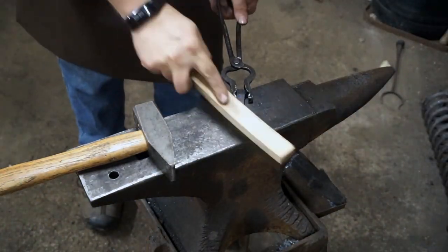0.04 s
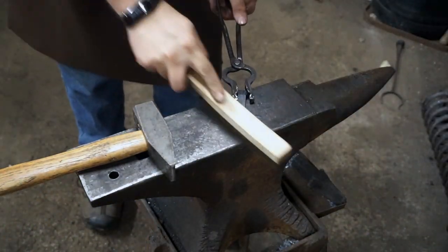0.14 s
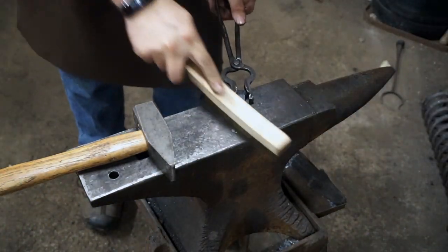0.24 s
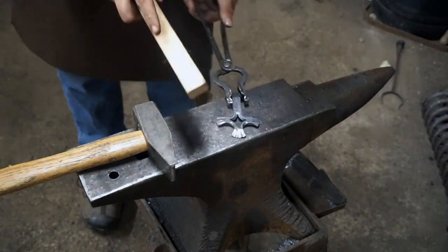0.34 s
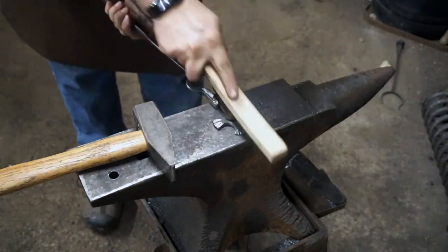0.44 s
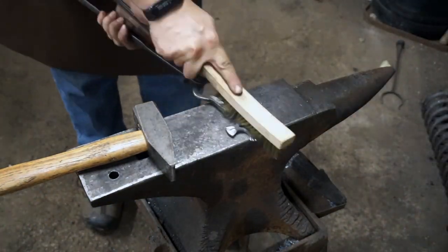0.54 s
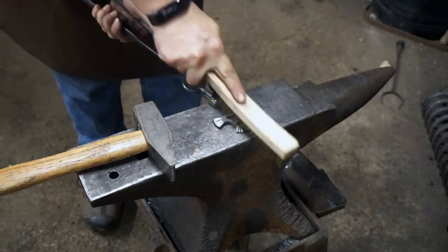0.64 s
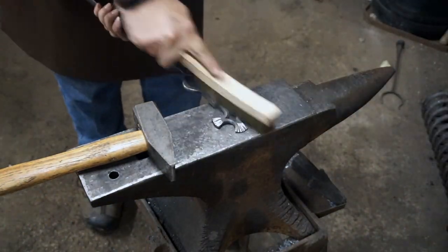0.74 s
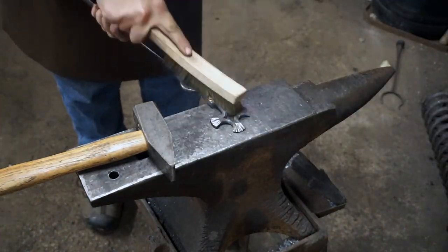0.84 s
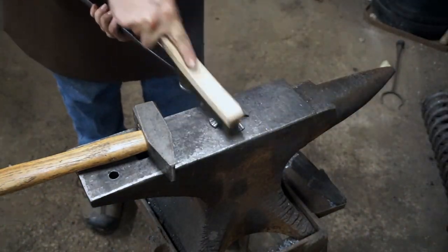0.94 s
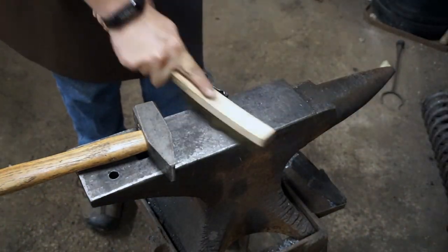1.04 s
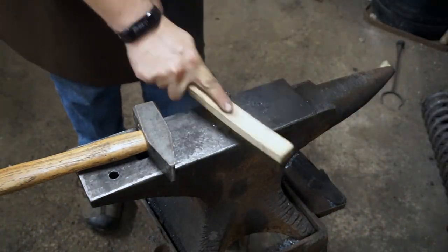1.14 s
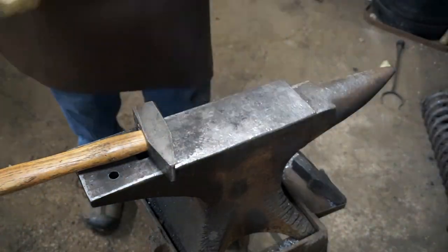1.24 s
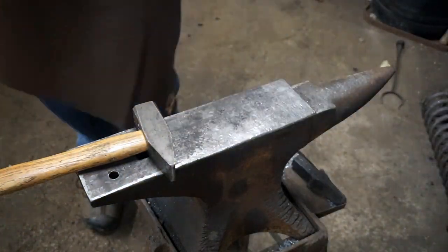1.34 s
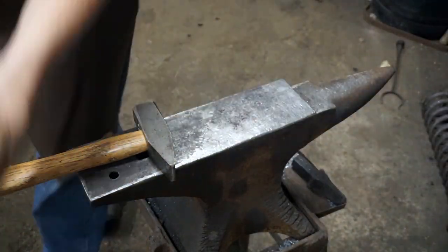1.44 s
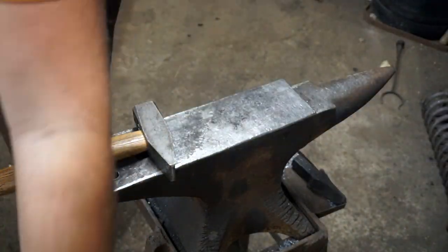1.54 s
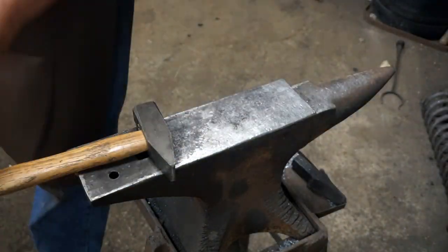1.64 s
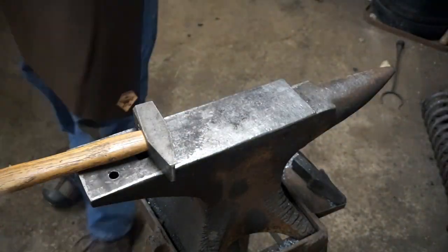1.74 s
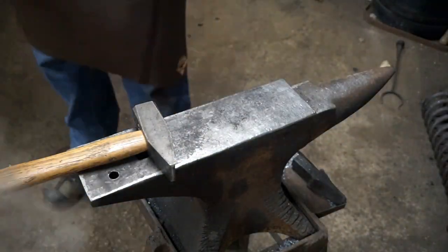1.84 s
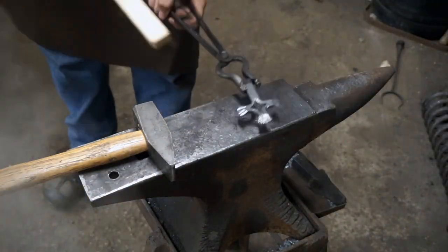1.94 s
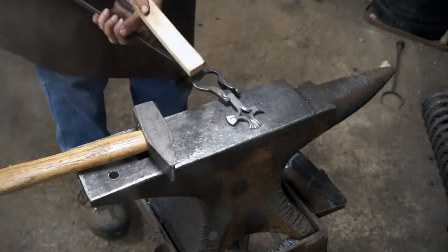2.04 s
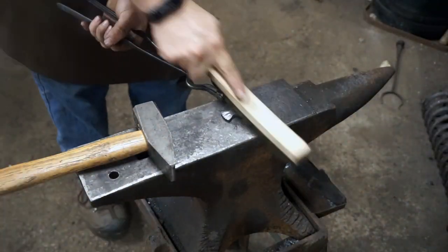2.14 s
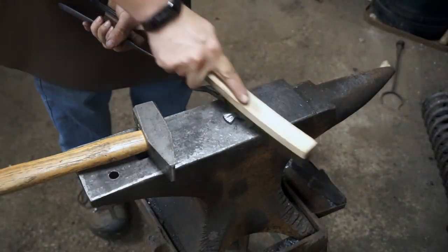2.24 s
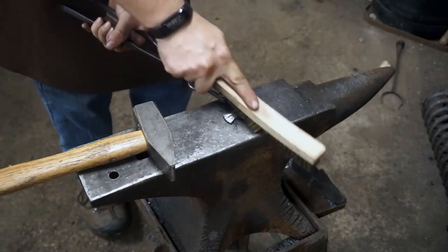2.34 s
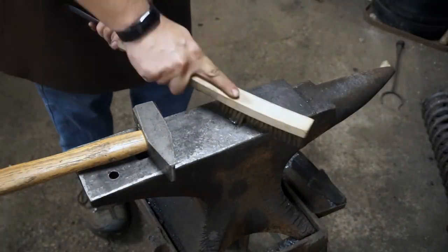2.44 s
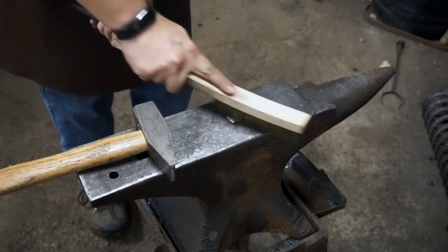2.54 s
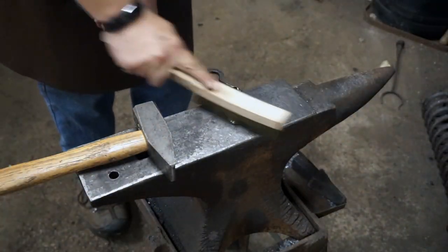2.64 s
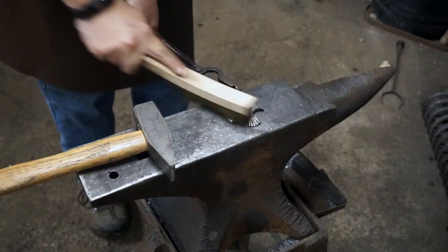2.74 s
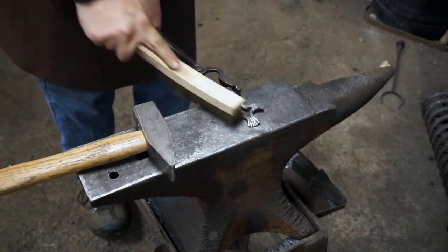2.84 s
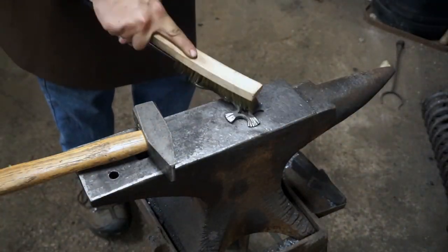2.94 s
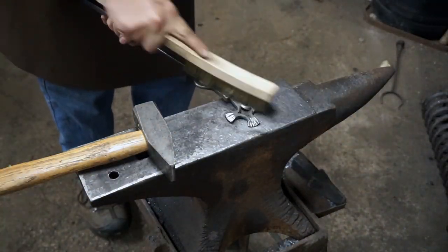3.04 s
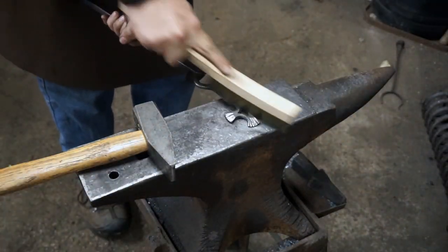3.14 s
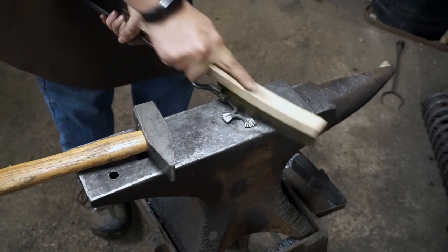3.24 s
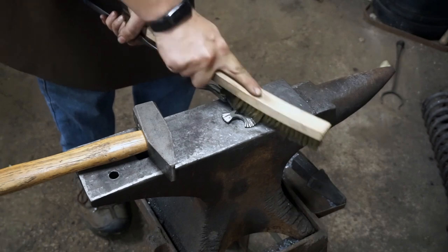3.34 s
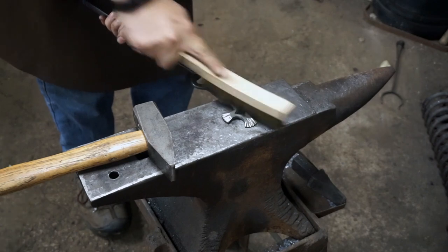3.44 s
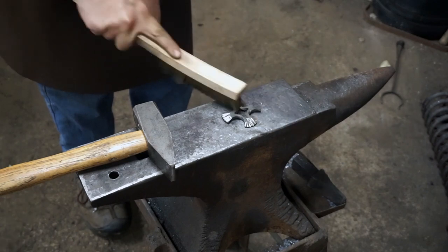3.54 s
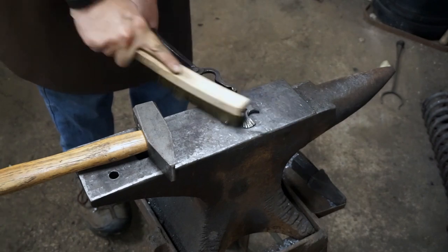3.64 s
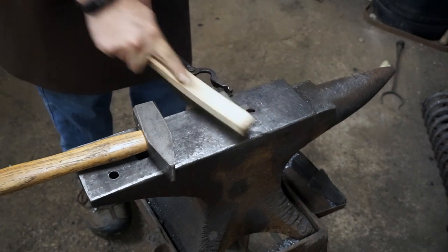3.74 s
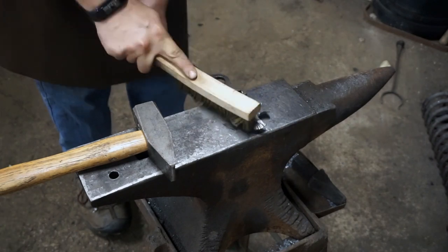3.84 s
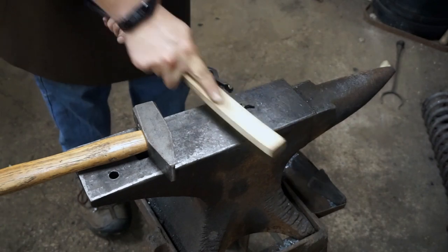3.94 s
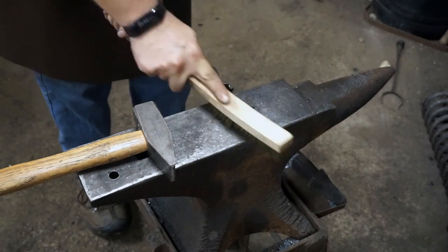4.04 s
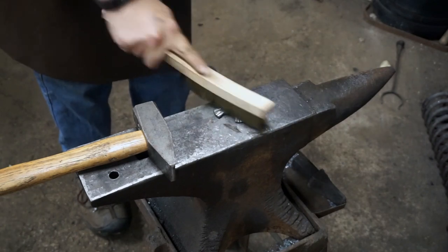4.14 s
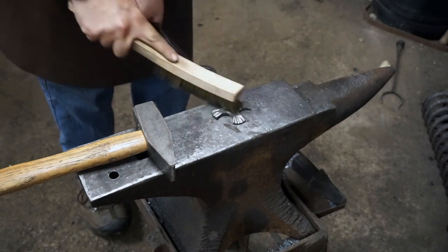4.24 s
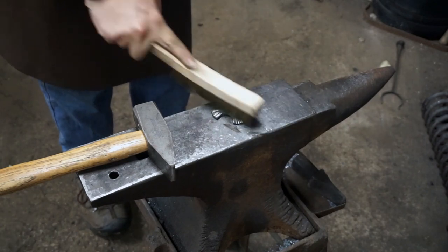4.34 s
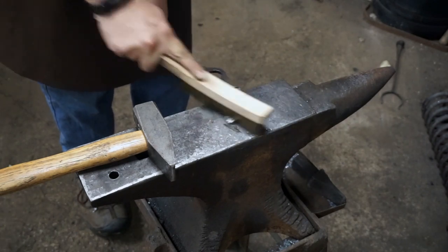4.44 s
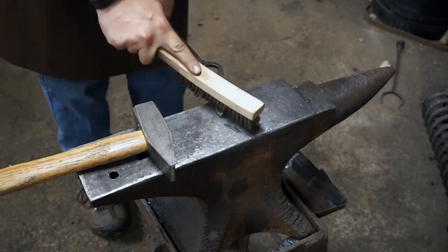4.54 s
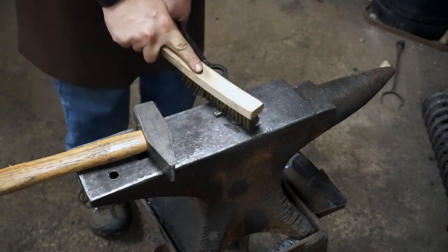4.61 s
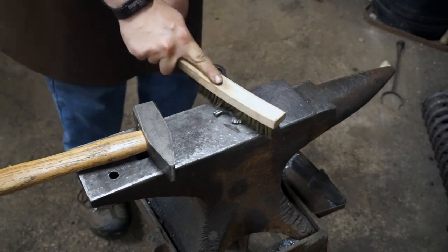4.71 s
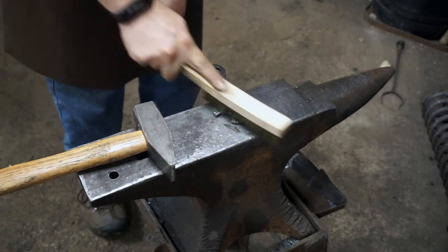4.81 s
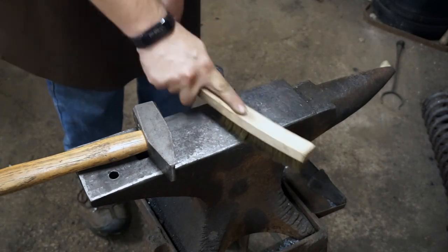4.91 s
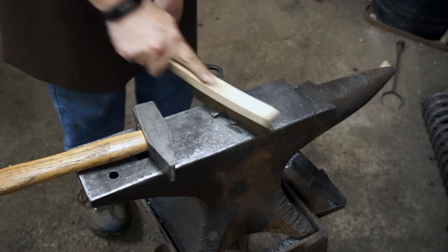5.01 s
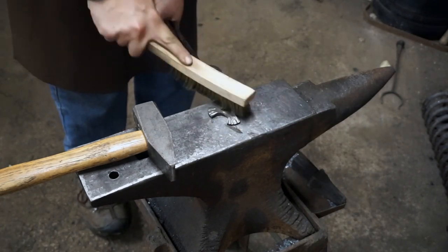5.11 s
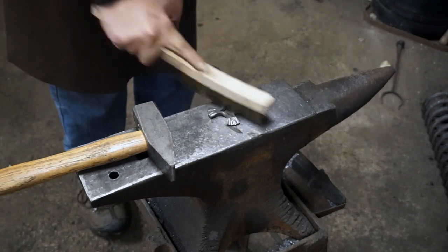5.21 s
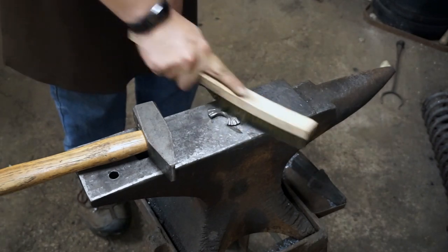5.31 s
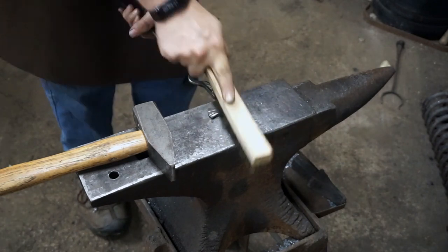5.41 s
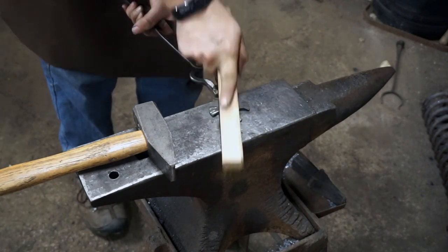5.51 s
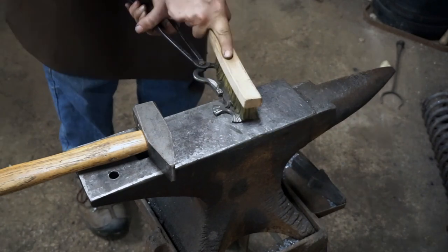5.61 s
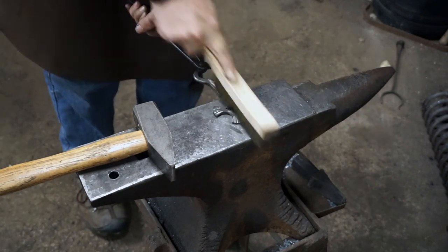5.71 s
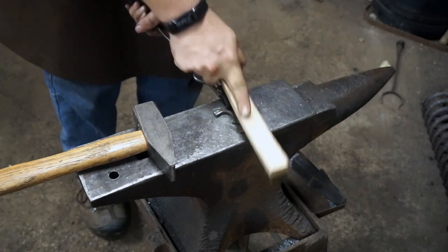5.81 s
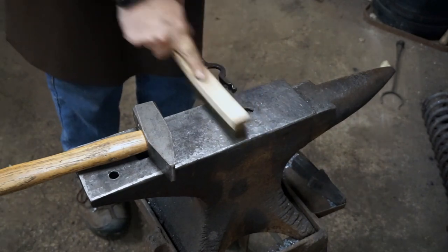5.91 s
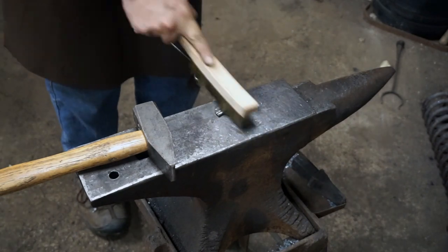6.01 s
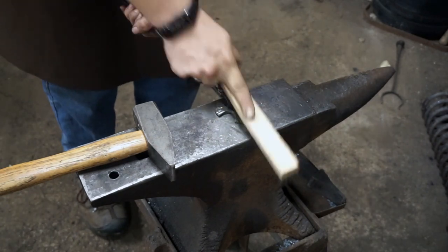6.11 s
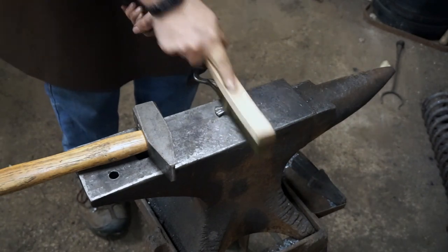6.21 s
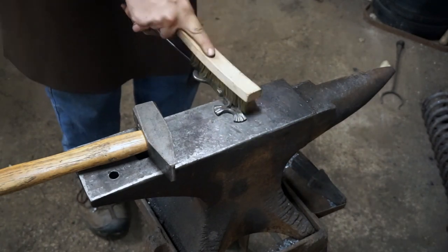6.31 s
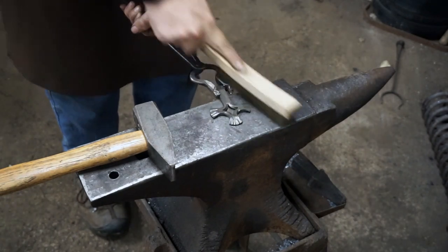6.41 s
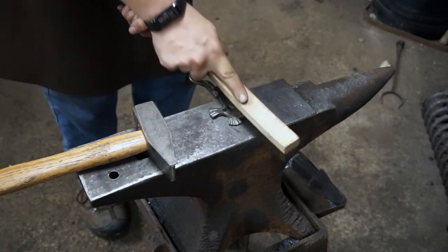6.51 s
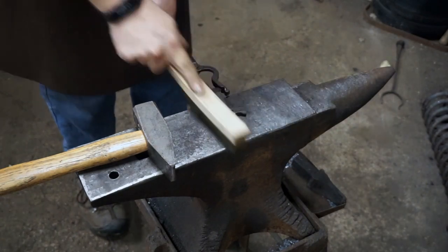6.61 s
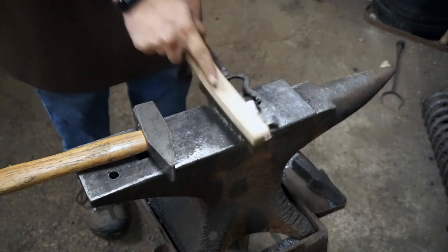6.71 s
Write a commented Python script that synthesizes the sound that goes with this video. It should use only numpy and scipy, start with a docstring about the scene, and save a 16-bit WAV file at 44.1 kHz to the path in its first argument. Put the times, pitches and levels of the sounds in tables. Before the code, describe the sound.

A wire brush scrubs a small metal piece on an anvil in fast, hissing strokes, pausing once as a steel tool clatters down.

```python
"""A wire brush scrubs a small forging on an anvil, about 22 strokes a second.
Wire tips slip and snag; the piece knocks and slides on the steel face. In a pause a steel tool
is put down with a clatter further off, then the tongs set the piece back and scrubbing resumes.
A hard-walled workshop echoes; a machine whines faintly in the distance."""
import sys
import numpy as np
from scipy import signal
from scipy.fft import rfft, irfft, next_fast_len
from scipy.io import wavfile
from scipy.ndimage import uniform_filter1d, map_coordinates

SR = 44100
rng = np.random.default_rng(int(sys.argv[2]) if len(sys.argv) > 2 else 0)


def store_pcm(level_fs):
    """Save levels as 16-bit WAV."""
    pcm = np.round(np.clip(level_fs, -1, 1) * 32767).astype(np.int16)
    wavfile.write(sys.argv[1], SR, np.atleast_2d(pcm).T)


N = 298157

# Spectra of the noise sources. Each row: frequency in Hz, relative density in dB.
AIR_SPECTRUM = [(25, -42), (150, -46), (230, -22), (320, -8.5), (480, -5.5), (700, 3), (1150, 6.5),
                (2500, 10.5), (6000, 6), (16000, -27.5)]
TOOL_SPECTRUM = [(150, -46), (400, -25.5), (700, -21.5), (1000, -10), (1350, -6.5), (1700, -9.5),
                 (1930, 3.5), (2200, -0.5), (2700, -2), (4600, -4.5), (8000, -5), (12000, -1.5), (15500, 1)]
SLIDE_SPECTRUM = [(200, -60), (1500, -33), (3000, -9.5), (6200, -6.5), (8200, -6), (9900, 1), (11500, -1.5),
                  (15000, -3.5)]
THUD_SPECTRUM = [(100, -61), (300, -39), (650, -32), (1050, -9), (1700, -7), (1930, -1.5), (2250, 2),
                 (3200, -2.5), (5000, -3.5), (8000, -6.5), (15000, -10)]
RASP_SPECTRUM = [(150, -70), (400, -30.5), (700, -23), (1100, -9), (1700, -9.5), (1950, 0), (2200, -1),
                 (2600, -0.5), (3200, 1.5), (4500, 0), (7000, -5), (12000, -18)]
HISS_SPECTRUM = [(2500, -55), (5000, -18.5), (6600, -9.5), (7300, -3), (8100, -5), (9200, -1),
                 (10800, -4.5), (12000, -1.5), (12900, 2.5), (14000, -3.5), (16000, -8)]
# Workshop decay. Each row: frequency in Hz, T60 in seconds.
SHOP_T60_S = [(200, 0.54), (2000, 0.26), (7000, 0.57), (15000, 0.26)]
# Stereo likeness of room and bristles. Each row: frequency in Hz, left-right coherence from 0 to 1.
SHOP_COHERENCE = [(300, .995), (1200, 0.95), (2300, 0.77), (4500, 1), (14000, 0.11)]
BRUSH_COHERENCE = [(2000, 0.97), (4500, 0.51), (14000, 0.53)]
# Anvil to the right. Each row: frequency in Hz, left minus right in dB.
ANVIL_PAN_DB = [(2000, 0), (4000, -3), (8000, -3.5), (14000, -5)]
# Machine running up. Each row: time in seconds, pitch in Hz, level in dB.
MACHINE_LOW_TONE = [(0, 315, -99), (.6, 329, -97.5), (2.1, 343.7, -99), (3.1, 356, -115)]
MACHINE_HIGH_TONE = [(1.701, 534, -104), (2.5, 543.6, -88.5), (3.0, 573, -82.5), (3.1, 564, -115)]
# Tool landing. Each row: start in seconds, level in dB, rattle T60 in seconds, high-pass corner in Hz.
TOOL_CONTACTS = [(1.571, -29.5, 0.1, 1780), (1.583, -20, 0.074, 1300), (1.591, -15.5, 0.015, 1190),
                 (1.609, -29.5, 0.16, 596), (1.636, -27.5, 0.068, 1080), (1.654, -27, 0.097, 1110),
                 (1.782, -47.5, 0.22, 2020)]
# Piece slipping on anvil and tongs. Each row: start in seconds, end in seconds, level in dB.
PIECE_SLIDES = [(0.398, 0.464, -62.5), (1.311, 1.425, -61), (1.513, 1.57, -62), (1.988, 2.04, -55.5),
                (2.118, 2.2, -61), (4.538, 4.619, -58.5), (4.758, 4.846, -55.5)]
# Resonances of the held piece. Each row: frequency in Hz, relative level in dB, T60 in seconds.
PIECE_MODES = [(1450, -5, 0.07), (2000, 1, 0.2), (2187, -1.5, 0.1), (2560, -13.5, 0.044), (2950, -3, 0.086),
               (3060, 1, 0.1), (3520, -25, 0.051), (6100, -12, .09)]
# Piece and tongs hitting the anvil.
# Each row: start in seconds, level in dB, clink offset in dB, clink centre in Hz.
ANVIL_KNOCKS = [(0.388, -46.5, 5, 4530), (0.403, -44.5, 2, 3800), (1.5, -48.5, 6.5, 6100),
                (1.946, -48.5, 13, 6900), (2.047, -43, 7, 9300), (2.072, -32, 2, 7170),
                (3.955, -31.5, 4, 9200), (3.992, -41, 7.5, 8850), (4.174, -35, -6, 10100),
                (4.53, -43, 5.5, 7440), (4.566, -42, 4.5, 4030), (4.697, -39, 0.5, 7800),
                (4.735, -39, 4, 8600), (4.866, -45, 11, 8400), (5.201, -39, -5.5, 2400),
                (5.285, -37.5, -3, 2400), (5.519, -42, -10, 9600), (5.701, -35, -3, 8000),
                (6.247, -39, -2, 10300), (6.319, -40, -5, 2200), (6.405, -40, -4, 9360),
                (6.734, -44, 6, 4570)]
# Brush bearing down. Each row: time in seconds, rasp relative to hiss in dB.
BRUSH_PRESSURE = [(0, -24.5), (.55, -12.5), (1.2, -13.5), (2.2, -15.5), (3.5, -17), (3.8, -14.5),
                  (4.4, -16.5), (5.8, -16.5), (6.3, -15.5)]
# Tufts catching an edge and flicking free. Each row: start in seconds, level in dB.
WIRE_SNAGS = [(.776, -23.5), (.856, -24), (2.046, -24.5), (3.042, -27.5), (3.127, -27), (3.218, -27.5),
              (3.303, -25.5), (3.647, -27), (3.95, -31.5), (3.958, -19), (4.092, -29.5), (4.173, -26),
              (4.429, -30), (4.628, -40), (5.634, -27), (5.671, -25), (5.862, -28), (5.940, -28.5),
              (6.098, -27), (6.253, -25), (6.331, -26)]
# Scrubbing runs. Each row: start in seconds, end in seconds, stroke count, first stroke (push or pull),
# push level in dB, swell over the run in dB, pull relative to push in dB.
SCRUB_RUNS = [(-.021, 0.353, 7, "push", -46, 11.5, -2.5), (.484, 0.688, 4, "push", -42.5, -3, -3.5),
              (.682, 1.233, 13, "push", -41, -3, -3), (2.199, 3.035, 18, "push", -40.5, 1.5, -2.5),
              (3.036, 3.944, 21, "push", -40.5, -1.5, -2.5), (4.041, 4.553, 12, "pull", -41, -2, -4),
              (4.826, 5.461, 15, "pull", -42, 0, -3), (5.467, 5.937, 12, "push", -41.5, 3.5, -2),
              (5.935, 6.793, 22, "push", -41.5, -1, -1.3)]

BITE_DELAY_S = 0.0063  # from the start of a push until the wires catch


def amp(db):
    """Decibels to gain."""
    return 10 ** (np.asarray(db) / 20)


def unit_rms(x):
    """Scale to rms 1."""
    return x / np.sqrt(np.mean(x ** 2) + 1e-20)


def at_hz(points, hz):
    """Interpolate (Hz, value) points on a log axis."""
    knots_hz, values = np.transpose(points)
    return np.interp(np.log(hz + 1), np.log(knots_hz), values)


def curves(rows):
    """One value per sample for each column after the time."""
    times_s, *columns = np.transpose(rows)
    return [np.interp(np.arange(N) / SR, times_s, column) for column in columns]


def seconds(length_s):
    """Time axis."""
    return np.arange(int(length_s * SR)) / SR


def add(track, start_s, sound):
    """Mix a sound into a track in place."""
    start = round(start_s * SR)
    sound = sound[max(-start, 0):]
    part = track[max(start, 0):][:len(sound)]
    part += sound[:len(part)]


def filtered(x, response):
    """Apply a gain given as a function of Hz."""
    size = next_fast_len(x.shape[-1] + SR // 4)
    return irfft(rfft(x, size) * response(np.fft.rfftfreq(size, 1 / SR)), size)[..., :x.shape[-1]]


def band_limit(hz, top_hz=15950):
    """Gain of a steep, rounded low-pass."""
    return 1 / (1 + (hz / top_hz) ** 240)


def coloured(x, spectrum):
    """Give a white signal a spectrum at equal power."""
    return filtered(x, lambda hz: unit_rms(amp(at_hz(spectrum, hz)) * band_limit(hz)))


def ticks(size, spread_db):
    """Dense tiny impacts of unequal strength, rms 1."""
    return unit_rms(rng.standard_normal(size) * amp(spread_db * rng.standard_normal(size)))


def shifting(x, depth_db, width_hz, hold_s):
    """Moving contact points excite changing resonances: random gain over time and frequency."""
    spectra = signal.stft(x, nperseg=256)[2]
    rows = np.arange(spectra.shape[-2]) * SR / 256 / width_hz
    cols = np.arange(spectra.shape[-1]) * 128 / SR / hold_s
    knots = rng.standard_normal((int(rows[-1]) + 2, int(cols[-1]) + 2))
    field = map_coordinates(knots, np.meshgrid(rows, cols, indexing="ij"), order=1)
    return signal.istft(spectra * unit_rms(amp(depth_db * field)), nperseg=256)[1][..., :N]


def stereo(pair, coherence):
    """Mix two unrelated signals to left and right with a given coherence."""
    def mid_side_gains(hz):
        angle = np.arccos(np.clip(at_hz(coherence, hz), 0, 1)) / 2
        return np.array([np.cos(angle), np.sin(angle)])
    mid, side = filtered(pair, mid_side_gains)
    return np.array([mid + side, mid - side])


def in_shop(x, early_db, tail_db, early_t60_s=0.099, tail_rise_s=0.0061):
    """Direct sound, early reflections from nearby surfaces and the workshop's tail."""
    hz, frame_s, spectra = signal.stft(rng.standard_normal((2, SR // 2)), SR, nperseg=256)
    decay = amp(-60 * frame_s / at_hz(SHOP_T60_S, hz)[:, None])
    tail = signal.istft(spectra * decay, SR, nperseg=256)[1]
    t = np.arange(tail.shape[1]) / SR
    tail *= np.minimum(t / tail_rise_s, 1)
    early = rng.standard_normal(tail.shape) * amp(-60 * t / early_t60_s)
    echo = amp(tail_db) * tail / np.linalg.norm(tail[0])
    echo += amp(early_db) * early / np.linalg.norm(early[0])
    return x + signal.fftconvolve(np.atleast_2d(x), stereo(echo, SHOP_COHERENCE), axes=1)[:, :N]


def shop_air(level_db=-68):
    """Steady workshop noise."""
    return amp(level_db) * stereo(coloured(rng.standard_normal((2, N)), AIR_SPECTRUM), SHOP_COHERENCE)


def machine_whine():
    """A distant machine runs up: two tones climb slowly, then fade."""
    tones = map(curves, (MACHINE_LOW_TONE, MACHINE_HIGH_TONE))
    return sum(amp(db) * np.sqrt(2) * np.sin(2 * np.pi * np.cumsum(hz) / SR) for hz, db in tones)


def bump(start_s=2.94, level_db=-65, t60_s=0.22):
    """One soft, dull bump."""
    track, t = np.zeros(N), seconds(0.2)
    add(track, start_s, amp(level_db - 60 * t / t60_s) * ticks(len(t), spread_db=3))
    return coloured(track, [(150, -26), (550, 1), (1200, 4), (3000, -27)])


def support_thumps(anvil_db=-52, tool_db=-63, growth=1.2, t60_s=0.07, corner_hz=170):
    """Knocks and landings give their heavy support a faint, dull push."""
    track, t = np.zeros(N), seconds(0.2)
    for blows, support_db in ((ANVIL_KNOCKS, anvil_db), (TOOL_CONTACTS, tool_db)):
        hardest_db = max(row[1] for row in blows)
        for start_s, db, *_ in blows:
            push_db = hardest_db + support_db + growth * (db - hardest_db)
            add(track, start_s, amp(push_db - 60 * t / t60_s) * rng.standard_normal(len(t)))
    return filtered(track, lambda hz: unit_rms(1 / (1 + (hz / corner_hz) ** 2)))


def tool_clatter(rise_share=0.019):
    """A steel tool lands, rattles and settles; longer rattles build more slowly."""
    track, t = np.zeros(N), seconds(0.2)
    for start_s, db, t60_s, corner_hz in TOOL_CONTACTS:
        attack = 1 - np.exp(-t / (rise_share * t60_s))
        rattle = attack * amp(db - 60 * t / t60_s) * ticks(len(t), spread_db=5.5)
        highpass = signal.butter(2, corner_hz, "highpass", fs=SR, output="sos")
        add(track, start_s, signal.sosfilt(highpass, rattle))
    return coloured(shifting(track, depth_db=3, width_hz=200, hold_s=0.04), TOOL_SPECTRUM)


def piece_slides(attack_s=0.018, release_t60_s=0.28):
    """Steel scrapes lightly on steel: each slide sets in, holds and dies away."""
    envelope, t = np.zeros(N), seconds(0.5)
    for start_s, end_s, db in PIECE_SLIDES:
        release_db = -60 * np.maximum(t - (end_s - start_s), 0) / release_t60_s
        add(envelope, start_s, np.minimum(t / attack_s, 1) * amp(db + release_db))
    friction = envelope * ticks(N, spread_db=3.5)
    return coloured(shifting(friction, depth_db=0.5, width_hz=450, hold_s=0.019), SLIDE_SPECTRUM)


def rocking_contacts(strokes, loose_from_s=4.8, offset_db=-11, clink_db=-4, clink_hz=9000):
    """Regripped, the piece lies loosely and knocks at each push. Rows as in ANVIL_KNOCKS."""
    return [(start_s + BITE_DELAY_S, db + rng.normal(offset_db, 3), clink_db, clink_hz)
            for start_s, _, db, is_pull in strokes if not is_pull and start_s > loose_from_s]


def piece_knocks(contacts, thud_db=-9, chatter_db=-11, ring_db=-24.5, crack_db=-10, hardening=0.6,
                 attack_s=0.00069, crack_t60_s=0.018, chatter_t60_s=0.12):
    """The gripped piece chatters on the anvil and rings briefly, differently at each contact."""
    thuds, rings = np.zeros((2, N))
    t = seconds(0.2)
    attack = 1 - np.exp(-t / attack_s)
    decay = amp(-60 * t / chatter_t60_s)
    mode_hz, mode_db, mode_t60_s = np.transpose(PIECE_MODES)[:, :, None]
    hardest_db = max(row[1] for row in ANVIL_KNOCKS)
    for start_s, db, clink_db, clink_hz in contacts:
        blow = attack * amp(db)
        # harder blows start more sharply
        crack = amp(crack_db + hardening * (db - hardest_db) - 60 * t / crack_t60_s)
        add(thuds, start_s, blow * (crack + amp(thud_db) * decay) * ticks(len(t), spread_db=6))
        clink = blow * amp(clink_db) * (crack + amp(chatter_db) * decay) * ticks(len(t), spread_db=3)
        clink = filtered(clink, lambda hz: unit_rms(amp(-22 * np.log2((hz + 1) / clink_hz) ** 2)))
        mode_gains = amp(mode_db + rng.normal(0, 4, mode_hz.shape) - 60 * t / mode_t60_s)
        detuned_hz = mode_hz * rng.normal(1, 0.017, mode_hz.shape)
        ring = np.sum(mode_gains * np.sin(2 * np.pi * detuned_hz * t), axis=0)
        add(rings, start_s, clink + blow * amp(ring_db) * ring)
    return rings + coloured(thuds, THUD_SPECTRUM)


def hand_strokes(ease_in_db=-1.5, uneven_db=0.7, uneven_s=0.0018):
    """The hand pushes and pulls in turn, slightly unevenly. Rows: start_s, length_s, db, is_pull."""
    strokes = []
    for start_s, end_s, count, first, push_db, swell_db, pull_db in SCRUB_RUNS:
        count = round(count)
        length_s = (end_s - start_s) / count
        for k, (early, harder) in enumerate(rng.standard_normal((count, 2))):
            is_pull = (k + (first == "pull")) % 2 == 1
            db = push_db + swell_db * (k / count - 0.5) + pull_db * is_pull
            db += ease_in_db * (k == 0) + uneven_db * harder
            strokes.append((start_s + k * length_s - uneven_s * early, length_s, db, is_pull))
    return strokes


def stroke_speed(strokes, start_drop_db=8, stop_drop_db=11, push_crest=0.28, pull_crest=0.4):
    """Each stroke speeds up to a crest (a share of its length), then slows until the hand turns."""
    speed = np.zeros(N)
    for start_s, length_s, db, is_pull in strokes:
        crest = pull_crest if is_pull else push_crest
        progress = seconds(length_s) / length_s
        before = np.maximum(1 - progress / crest, 0)
        after = np.maximum((progress - crest) / (1 - crest), 0)
        add(speed, start_s, amp(db - start_drop_db * before ** 1.5 - stop_drop_db * after ** 1.5))
    return uniform_filter1d(speed, size=96)


def wire_flicks(strokes, snag_db=-13.5, snag_t60_s=0.035, snap_db=-11, snap_t60_s=0.013):
    """Envelope of wires catching and flicking free: big tufts on edges, a few wires at each push."""
    bites = [(start_s + BITE_DELAY_S, db + rng.normal(1, 1))
             for start_s, _, db, is_pull in strokes if not is_pull]
    power, t = np.zeros(N), seconds(0.06)
    flick = amp(snag_db - 60 * t / snag_t60_s) + amp(snap_db - 60 * t / snap_t60_s)
    for start_s, db in WIRE_SNAGS + bites:
        add(power, start_s, (amp(db) * flick) ** 2)
    return np.sqrt(power)


def wire_brush(strokes, clump_db=1.1, clump_hz=550):
    """Wire tips hiss over the scale in clumps; bearing down adds a lower rasp from the piece."""
    knots = rng.standard_normal(int(N * clump_hz / SR) + 4)
    clumps = map_coordinates(knots, [np.arange(N) * clump_hz / SR], order=1)
    drive = stroke_speed(strokes) * unit_rms(amp(clump_db * clumps))
    slips = np.hypot(drive, wire_flicks(strokes)) * ticks((2, N), spread_db=3)
    hiss = coloured(shifting(slips, depth_db=3.5, width_hz=300, hold_s=0.04), HISS_SPECTRUM)
    pressure_db, = curves(BRUSH_PRESSURE)
    smooth_drive = uniform_filter1d(drive, size=300)  # the rasp follows the hand less closely
    rub = smooth_drive * amp(pressure_db) * ticks((2, N), spread_db=6)
    rasp = coloured(shifting(rub, depth_db=3.5, width_hz=350, hold_s=0.03), RASP_SPECTRUM)
    return stereo(hiss + rasp, BRUSH_COHERENCE)


def scene():
    """Anvil close and to the right, tool further off."""
    strokes = hand_strokes()
    work = wire_brush(strokes) + piece_knocks(ANVIL_KNOCKS + rocking_contacts(strokes)) + piece_slides()
    anvil = in_shop(work, early_db=-6.5, tail_db=-9.5)
    pan = np.array([[0.5], [-0.5]])
    anvil = filtered(anvil, lambda hz: amp(pan * at_hz(ANVIL_PAN_DB, hz)))
    tool = in_shop(tool_clatter(), early_db=-5, tail_db=-3) * amp(-0.9 * pan)  # slightly right
    return anvil + tool + support_thumps() + bump() + shop_air() + machine_whine()


def record(dry):
    """Bass cut and band limit."""
    return filtered(dry, lambda hz: amp(at_hz([(170, -8), (290, 0)], hz)) * band_limit(hz))


dry = scene()
out = record(dry)
store_pcm(out)
```